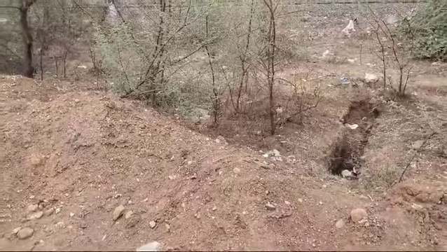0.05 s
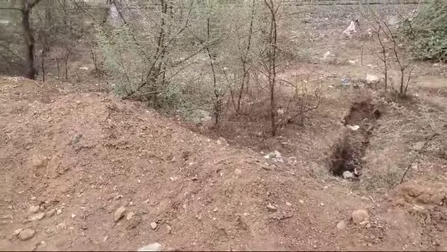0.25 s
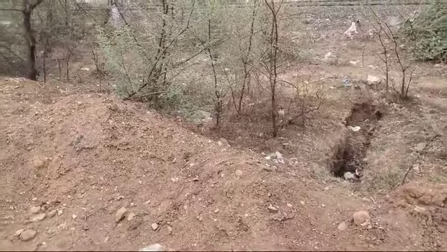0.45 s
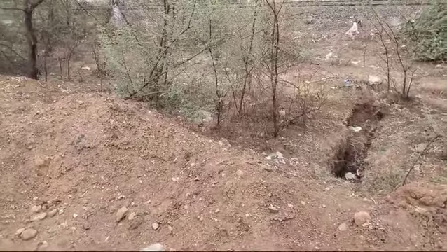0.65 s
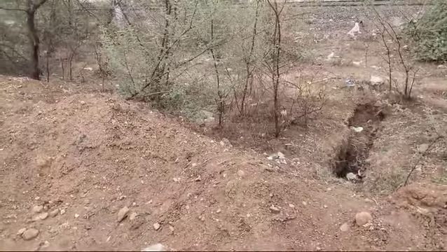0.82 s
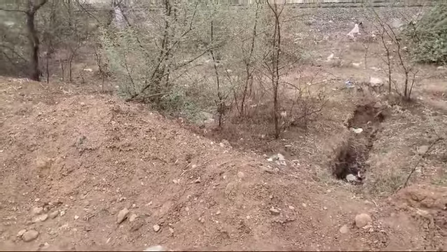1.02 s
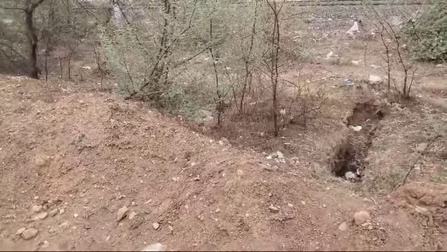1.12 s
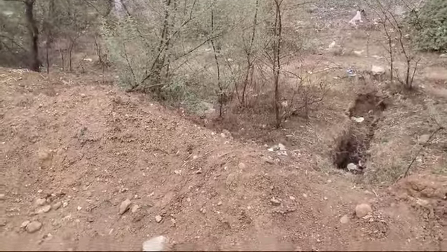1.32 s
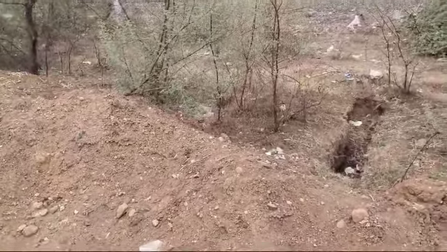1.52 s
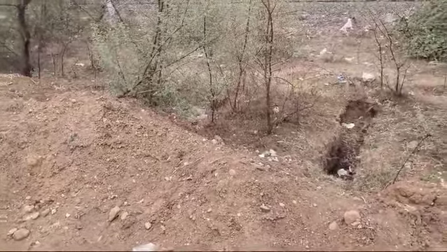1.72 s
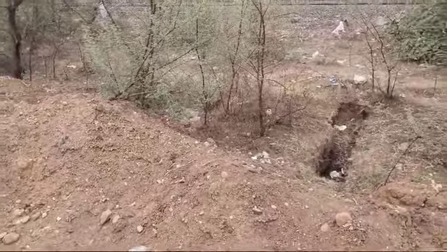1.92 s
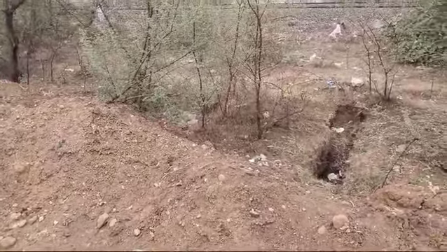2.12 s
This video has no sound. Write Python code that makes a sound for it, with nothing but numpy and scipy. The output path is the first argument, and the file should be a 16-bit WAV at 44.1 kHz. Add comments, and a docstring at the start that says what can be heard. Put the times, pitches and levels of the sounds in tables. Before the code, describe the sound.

A steady, high-pitched cicada drone outdoors, with soft wind gusts and a quick bird chirp.

```python
"""Cicadas drone in dry scrub, mostly to the right: a few near ones buzz out of a far chorus,
each clicking its tymbals into a body resonance, blurred by echoes from bushes and ground.
A bird whistles one quick rising chirp and others answer faintly from far off.
Light gusts buffet each port of the stereo microphone on its own. Soft knocks close by
and dry ticks in the grass sit over the background hiss of open country."""
import sys
import numpy as np
from scipy import signal
from scipy.fft import rfft, irfft
from scipy.io import wavfile

SR = 44100
rng = np.random.default_rng(int(sys.argv[2]) if len(sys.argv) > 2 else 0)


def persist_wave(psi):
    """Save psi, clipped to +-1, as 16-bit WAV."""
    counts = np.round(np.clip(psi, -1, 1) * 32767).astype(np.int16)
    wavfile.write(sys.argv[1], SR, np.atleast_2d(counts).T)


N = 94815
TIME = np.arange(N) / SR
BIN_HZ = np.maximum(np.arange(N // 2 + 1) * SR / N, 1)
SCRUB_ECHO_S = 0.022

# tone colour of the cicadas, near and far: frequency_hz, relative_db
CICADA_SPECTRUM = [(3000, -48.5), (3900, -26), (4250, -16), (4550, -15.5), (4750, -5.5), (4930, -1.5),
                   (5250, 4), (5550, -2.5), (5850, -0.5), (6170, -1), (6330, -4.5), (6600, -8.5),
                   (6850, -16), (7300, -15.5), (7750, -27.5), (9500, -36)]


def cicadas(trim_db=2.0):
    """Near and far cicadas swell and ease together, and the lower voices surge near the end."""
    # swell of the chorus: time_s, relative_db, pan_db (left minus right throughout)
    swell = [(0.0, -52.5, -7), (0.04, -49.5, -11), (0.08, -51, -6.5), (0.62, -51, -6.5), (0.93, -53, -4),
             (1.53, -50.5, -6.5), (1.9, -49, -6.5), (2.13, -51, -4), (2.15, -49, -6)]
    time_s, swell_db, pan_db = np.transpose(swell)
    gain = from_db(trim_db + np.interp(TIME, time_s, swell_db)) * panned(np.interp(TIME, time_s, pan_db))
    chorus = (far_chorus() + near_cicadas()) * gain + steady_singers()
    lower_voices = colour(chorus, np.abs(resonance(hz=5080, width_hz=390)) ** 2)
    surge = from_db(1.5 * bump(middle_s=1.83, length_s=0.26))
    return chorus + lower_voices * (surge - 1)


def tymbal(clicks_per_s, wobble, spread_db=0.8):
    """A cicada's tymbal makes a train of narrow clicks whose rate and strength waver."""
    cycles = rng.random() + np.cumsum(clicks_per_s * (1 + wobble * drift(hz=12))) / SR
    samples_off = (cycles % 1 - .5) * SR / clicks_per_s
    clicks = np.sinc(samples_off) * np.exp(-(samples_off / 10) ** 2)
    return clicks * from_db(spread_db * drift(hz=30))


def near_cicadas():
    """Each clicks into its body resonance; part reaches the microphone straight, part scattered."""
    # the nearest insects: clicks_per_s, body_hz, width_hz, relative_db, growth_db_per_s,
    # pan_db, left_lead_ms, scattered_share
    voices = [(456.2, 5650, 1100, -9, -1, -8, .32, .05), (400.4, 6150, 700, -15, 0, 3, .32, .15),
              (390.9, 5080, 350, -12.5, 3, 1, 0, .3), (410.9, 4960, 400, -14.5, 1, -2, 0, .45),
              (384.4, 6160, 250, -16, -4, -2, .3, .45), (415.3, 5700, 500, -16, 3, 0, .3, .45)]
    out = 0
    for clicks_per_s, body_hz, width_hz, db, growth, pan_db, lead_ms, share in voices:
        body = resonance(body_hz, 2 * width_hz) ** 2 * from_db(at_hz(CICADA_SPECTRUM))
        buzz = rms_one(colour(tymbal(clicks_per_s, wobble=.0016), body))
        early_left = colour(buzz, np.exp(2j * np.pi * BIN_HZ * lead_ms / 1000))
        direct = np.array([early_left, buzz])
        scattered = rms_one(scatter(buzz, SCRUB_ECHO_S))
        gain = from_db(db + growth * (TIME - TIME.mean())) * panned(pan_db)
        out += gain * (np.sqrt(1 - share) * direct + np.sqrt(share) * scattered)
    return out


def far_chorus(count=40, relative_db=-0.43):
    """Many distant cicadas, each at its own click rate, blurred by the scrub."""
    # where the chorus sits: frequency_hz, pan_db
    placement = [(4200, 5), (4800, -1), (5200, 4.5), (5600, 1), (6200, -8.5), (6800, -3), (7600, 8.5)]
    click_rates = rng.uniform(180, 470, count)
    voices = sum(scatter(rms_one(tymbal(rate, wobble=.008)), SCRUB_ECHO_S) for rate in click_rates)
    spectrum = from_db(at_hz(CICADA_SPECTRUM)) * panned(at_hz(placement))
    return from_db(relative_db) * rms_one(colour(voices, spectrum))


def steady_singers(trim_db=2):
    """Insects that hold their pitch: thin tones fading in and out inside the chorus."""
    # one tone per singer: pitch_hz, relative_db
    tones = [(4931, -69), (5082, -66), (5219, -70), (5329, -69), (5399, -70), (5475, -70), (5529, -72),
             (5814, -69), (6121, -68), (6406, -72), (6535, -78), (6595, -78), (6955, -81)]
    return panned(-4) * sum(from_db(db + trim_db) * band_noise(hz, width_hz=22.7) for hz, db in tones)


def birds(edge_s=0.0056, pitch_waver=0.0071, flutter_db=1.5, echo_db=-8.5):
    """Short, slightly unsteady whistles with a tail of echoes from the trees."""
    # whistled notes: start_s, length_s, first_hz, last_hz, level_db, pan_db
    notes = [(0.092, 0.036, 3010, 3020, -67, -3), (0.372, 0.031, 2430, 2310, -68, 4),
             (0.405, 0.07, 2278, 2275, -66.5, -0.5), (0.535, 0.038, 2350, 2480, -70.5, 0),
             (0.736, 0.045, 2360, 2290, -70, 5), (0.766, 0.045, 2060, 2070, -69.5, 16),
             (1.165, 0.031, 2070, 2096, -59, -4), (1.193, 0.03, 2450, 2620, -57, 9),
             (1.214, 0.02, 2770, 3100, -59, -10), (1.229, 0.033, 2997, 2980, -44.5, -3),
             (1.254, .028, 2710, 2680, -66, 12), (1.254, 0.062, 2275, 2290, -64.5, 6),
             (2.007, 0.032, 2380, 2340, -67.5, 5)]
    out = 0
    for start_s, length_s, first_hz, last_hz, level_db, pan_db in notes:
        end_s = start_s + length_s
        glide_hz = np.interp(TIME, [start_s, end_s], [first_hz, last_hz])
        pitch_hz = glide_hz * (1 + pitch_waver * drift(hz=121))
        whistle = np.sqrt(2) * np.sin(2 * np.pi * np.cumsum(pitch_hz) / SR)
        edge = np.clip(np.minimum(TIME - start_s, end_s - TIME) / edge_s, 0, 1)
        envelope = np.sin(np.pi / 2 * edge) ** 2 * from_db(level_db + flutter_db * drift(hz=90))
        out += whistle * envelope * panned(pan_db)
    return out + from_db(echo_db) * scatter(out, decay_s=0.052)


def wind(rumble_db=-12.5):
    """Each gust sheds eddies at the microphone ports: a lumpy low flutter in soft turbulence."""
    # gusts on the ports: middle_s, length_s, left_db, right_db, buffet_hz
    gusts = [(0.214, 0.072, -42, -38, 65.1), (0.273, 0.024, -32.5, -59, 60.06),
             (0.326, 0.009, -28.5, -55, 63.3), (0.35, 0.072, -42, -58, 61.5),
             (0.507, 0.055, -42.5, -44.5, 61), (0.574, 0.067, -28.5, -37.5, 74),
             (0.654, 0.059, -30, -34.5, 72), (0.75, 0.07, -37.5, -36, 75),
             (0.792, 0.017, -58, -19.5, 105.2), (0.836, 0.12, -38, -31.5, 68.04),
             (0.873, 0.031, -21.5, -26.5, 63), (0.907, 0.013, -34, -24, 78.2),
             (0.957, 0.069, -35, -30, 59.9), (1.117, 0.086, -43.5, -45.5, 86.5),
             (1.179, 0.028, -31, -31.5, 64), (1.211, 0.11, -43, -27, 60), (1.31, 0.084, -36, -32, 63.96),
             (1.363, 0.064, -35.5, -21, 88.6), (1.403, 0.11, -39, -50, 64.6),
             (1.66, 0.017, -29.5, -44, 65.5), (1.695, 0.036, -37.5, -44, 59.6),
             (1.735, 0.016, -35.5, -27.5, 73.4), (1.765, 0.023, -33, -39, 59),
             (1.827, 0.028, -32, -30, 69.5), (1.866, 0.021, -57, -36, 60.1)]
    # colour of the turbulence: frequency_hz, relative_db
    turbulence = [(15, -12), (35, -2), (80, 0), (155, -1), (220, -14), (320, -28), (450, -50), (900, -75)]
    out = 0
    for middle_s, length_s, left_db, right_db, buffet_hz in gusts:
        rumble = rms_one(colour(rng.standard_normal((2, N)), from_db(at_hz(turbulence))))
        flutter = np.array([eddies(buffet_hz), eddies(buffet_hz)])
        envelope = bump(middle_s, length_s) * from_db([[left_db], [right_db]])
        out += envelope * (flutter + from_db(rumble_db) * rumble)
    return out


def eddies(buffet_hz, wander=.125, lumps_db=1.3):
    """Eddies pass one port at a wandering rate and with uneven strength."""
    cycles = rng.random() + np.cumsum(buffet_hz * np.exp(wander * drift(hz=40))) / SR
    return rms_one(np.sin(2 * np.pi * cycles) * from_db(lumps_db * drift(hz=40)))


def close_knocks():
    """Soft knocks, scuffs and a click beside the microphone, each a dying burst of noise."""
    # small impacts: start_s, centre_hz, width_hz, decay_s, left_db, right_db
    knocks = [(0.708, 620, 950, 0.011, -60, -51.5), (0.713, 2270, 1500, 0.0006, -52, -55),
              (0.761, 191, 68, 0.034, -70, -36.5), (1.101, 230, 135, 0.013, -66, -42)]
    return sum(burst(start_s, decay_s) * from_db([[left_db], [right_db]]) * band_noise(hz, width_hz)
               for start_s, hz, width_hz, decay_s, left_db, right_db in knocks)


def grass_ticks():
    """Dry ticks in the grass, a little to the left: tiny bursts of high noise."""
    # ticks: start_s, level_db
    ticks = [(2.0, -76), (2.013, -62.5), (2.026, -72)]
    envelope = sum(burst(start_s, decay_s=0.0036) * from_db(db) for start_s, db in ticks)
    return envelope * band_noise(hz=10600, width_hz=900) * panned(3)


def background_hiss(low_below_hz=600, treble_above_hz=1900, duck_db=-9.5):
    """Background hiss whose bands flicker in level, like audio compression."""
    # colour of the hiss: frequency_hz, density_db (power per hertz)
    spectrum = [(20, -68.5), (50, -70), (100, -71), (170, -78.5), (300, -84.5), (440, -96), (760, -89.5),
                (1100, -95.5), (1400, -99), (1750, -97), (2300, -96.5), (3400, -105), (8500, -111),
                (9700, -120), (10500, -116), (12500, -123), (15500, -120.5)]
    # how alike the two ports hear it: frequency_hz, correlation
    likeness = [(60, 0.72), (140, 0.5), (330, .5), (520, -0.12), (800, -0.67), (1150, -0.69), (1450, -0.63),
                (1900, 0), (2900, 0.4), (4500, 0.84), (7000, 0)]
    # where it sits: frequency_hz, pan_db
    placement = [(60, -1), (300, -1), (600, -2.5), (1200, -1), (1700, 3), (2400, 5), (3400, 0.5),
                 (8000, -6), (11000, 4), (15000, 4)]
    # rise and fall of the treble hiss: time_s, gain_db
    treble_curve = [(0, 3), (.4, 0.5), (.75, 2), (.85, -2.5), (1.35, 0), (1.5, -1), (1.95, -0.5),
                    (2.02, 0.5), (2.15, 2)]
    mid, side = rng.standard_normal((2, N))
    alike = at_hz(likeness)
    pair = colour(mid, np.sqrt((1 + alike) / 2)) + colour(side, np.sqrt((1 - alike) / 2)) * [[1], [-1]]
    hiss = colour(pair, np.sqrt(SR / 2) * from_db(at_hz(spectrum)) * panned(at_hz(placement)))
    low = colour(hiss, 1 / (1 + (BIN_HZ / low_below_hz) ** 4))
    treble = colour(hiss, 1 / (1 + (treble_above_hz / BIN_HZ) ** 4))
    # the low background noise ducks briefly, as under a recorder's wind suppressor
    duck = from_db(duck_db * bump(middle_s=0.98, length_s=0.14))
    treble_gain = from_db(np.interp(TIME, *np.transpose(treble_curve)))
    return band_flicker(low) * duck + band_flicker(hiss - low - treble) + treble * treble_gain


def band_flicker(x, count=6, depth_db=3):
    """A few overlapping bands each flicker in level, like audio compression."""
    place = np.interp(np.log(BIN_HZ), np.log([200, 2500]), [0, count - 1])
    bands = (colour(x, np.maximum(1 - np.abs(place - k), 0)) for k in range(count))
    return sum(band * from_db(depth_db * drift(hz=11.3)) for band in bands)


def scatter(x, decay_s):
    """Dense dying echoes from bushes and ground, different at each port."""
    echoes = rng.standard_normal((2, N)) * np.exp(-TIME / decay_s)
    return colour(x, rfft(rms_one(echoes)) / np.sqrt(N))


def resonance(hz, width_hz):
    """Response of one resonance, 1 at its peak."""
    return 1 / (1 + 1j * (BIN_HZ ** 2 - hz ** 2) / (BIN_HZ * width_hz))


def band_noise(hz, width_hz):
    """Stereo noise passed twice through a resonance."""
    return rms_one(colour(rng.standard_normal((2, N)), resonance(hz, width_hz) ** 2))


def drift(hz, step=32):
    """Smooth random wander of rms 1, mostly slower than hz."""
    pole = np.exp(-2 * np.pi * step * hz / SR)
    noise = rng.standard_normal(N // step + 1002)
    slow = signal.lfilter([1], [1, -2 * pole, pole * pole], noise)[1000:]   # once settled
    return np.interp(np.arange(N) / step, np.arange(len(slow)), rms_one(slow))


def bump(middle_s, length_s):
    """A smooth rise and fall, half height at the ends of its length."""
    return np.exp(-np.log(2) * np.abs(2 * (TIME - middle_s) / length_s) ** 3)


def burst(start_s, decay_s):
    """A quick rise and an exponential fall, height 1."""
    age = np.maximum(TIME - start_s, 0) / decay_s
    shape = (1 - np.exp(-4 * age)) * np.exp(-age)
    return shape / (shape.max() + 1e-12)


def colour(x, gain):
    """Filter by a gain per frequency."""
    return irfft(rfft(x) * gain, N)


def at_hz(points):
    """Read a table along log frequency."""
    hz, value = np.transpose(points)
    return np.interp(np.log(BIN_HZ), np.log(np.maximum(hz, 1)), value)


def panned(pan_db):
    """Left and right gains of unchanged total power; positive is to the left."""
    gains = from_db(np.array([[.5], [-.5]]) * pan_db)
    return gains / np.sqrt(np.mean(gains ** 2, axis=0))


def from_db(db):
    """Decibels to gain."""
    return 10 ** (np.asarray(db) / 20)


def rms_one(x):
    """Scale each channel to rms 1."""
    return x / np.sqrt(np.mean(x ** 2, axis=-1, keepdims=True) + 1e-20)


def scene():
    """All the layers together, in stereo."""
    return cicadas() + birds() + wind() + close_knocks() + grass_ticks() + background_hiss()


def record(dry):
    """The top is cut steeply."""
    cutoff_hz = 15750
    return signal.sosfilt(signal.ellip(12, .1, 80, cutoff_hz, fs=SR, output="sos"), dry)


dry = scene()
out = record(dry)
persist_wave(out)
```